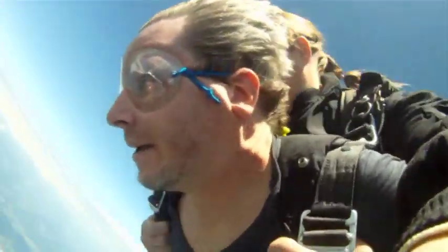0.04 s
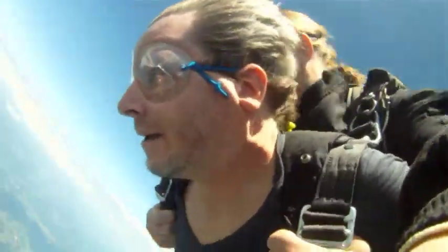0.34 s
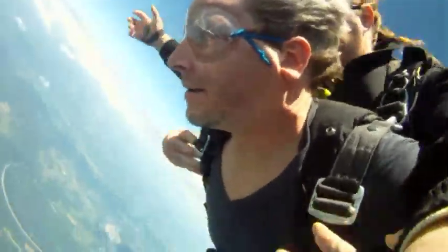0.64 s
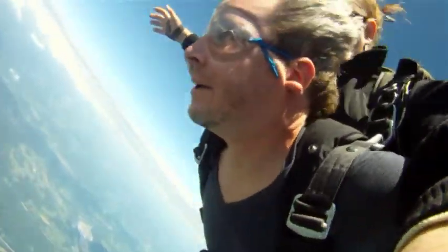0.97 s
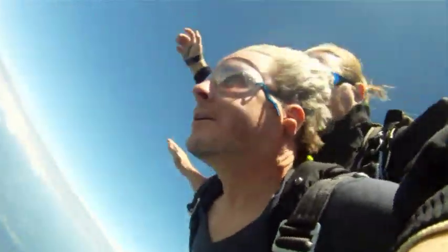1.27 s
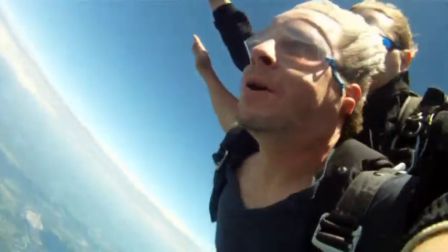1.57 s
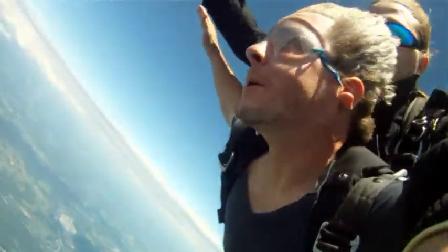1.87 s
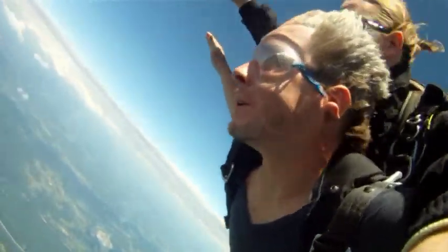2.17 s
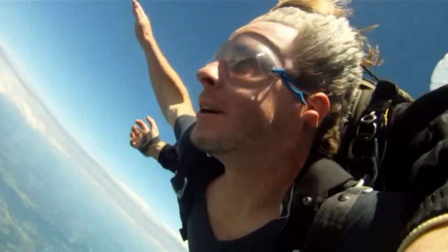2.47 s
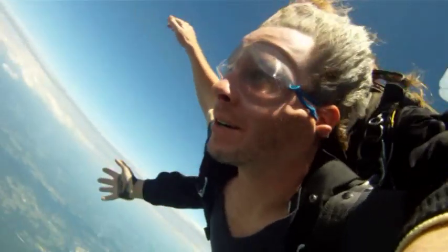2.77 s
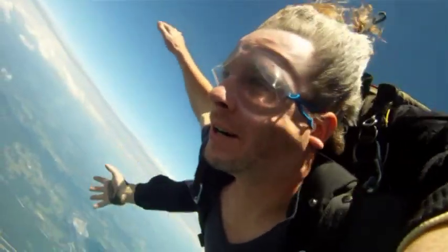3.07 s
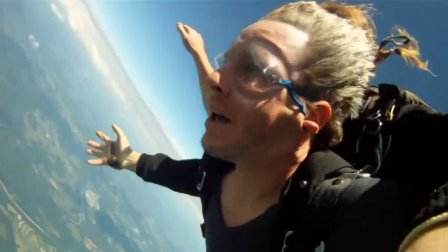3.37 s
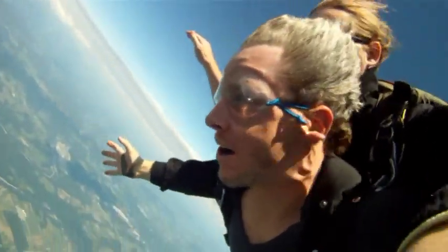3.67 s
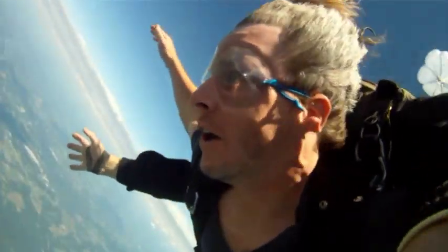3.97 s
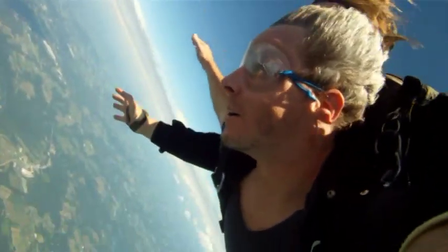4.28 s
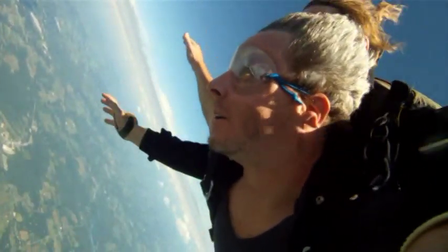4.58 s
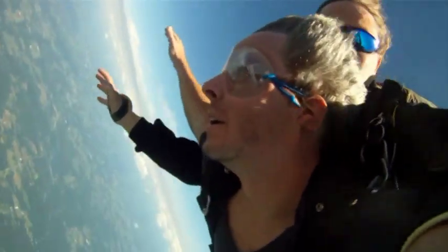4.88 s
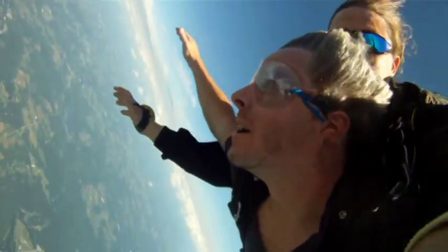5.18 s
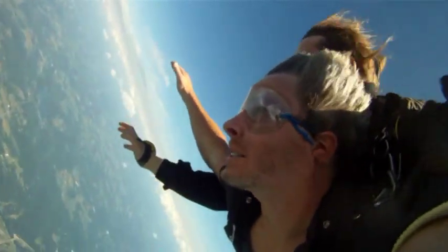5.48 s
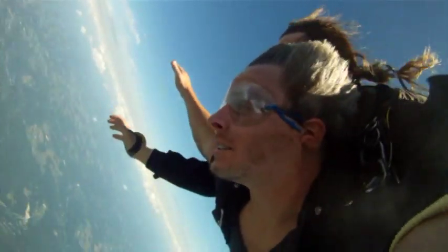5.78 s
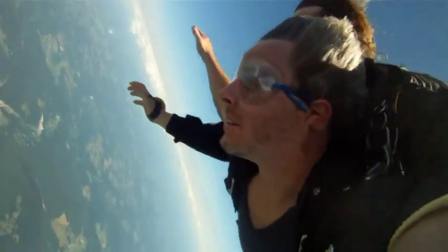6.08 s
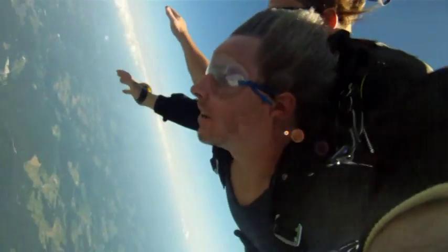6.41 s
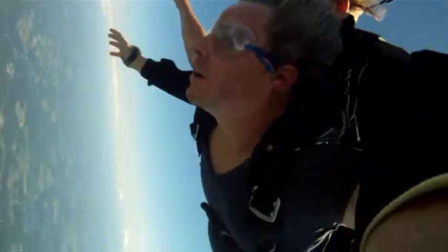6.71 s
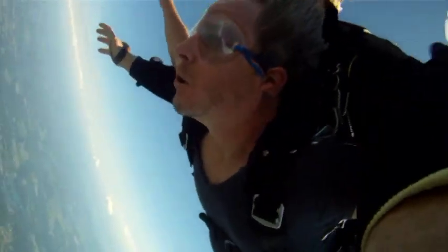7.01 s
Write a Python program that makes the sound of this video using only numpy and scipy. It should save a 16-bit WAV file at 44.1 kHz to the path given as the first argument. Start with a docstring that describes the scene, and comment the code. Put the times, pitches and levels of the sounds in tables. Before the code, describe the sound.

Loud freefall wind hits a small camera microphone at arm's length, a continuous roar and rumble with slight overload and a gritty fizz. It cuts out almost immediately and returns at 0.3 seconds as a bright, fluttering rush and hiss. Short roaring gusts pass at about 0.9 and 1.3 seconds. From 1.5 seconds, low buffeting trades places with the brighter noise, and brief gusts boom around 1.8, 3.2 and 3.7 seconds. The sound drops abruptly to silence for a tenth to a quarter of a second at about 2.4, 4.1, 4.7, 5.5 and 6.3 seconds, snapping straight back each time. The buffeting is heaviest at 5.6 seconds, a couple of gusts follow around 6 seconds, and the hiss peaks at 6.6 seconds. A low boom near 6.9 seconds and a short hollow howl just after 7 seconds close it, with the wind still rushing.

```python
"""Freefall wind on the microphone of a small camera at arm's length, over a steady roar and rumble.
The sound cuts out almost at once, then returns as bright rush and hiss. From 1.5 s these trade places
with low buffeting as the camera turns; single gusts boom or howl. Five more dropouts fall in 2.4-6.5 s.
Buffeting peaks at 5.6 s, hiss at 6.6 s; a low boom and a howl end it. Throughout, the capsule
overloads sooner on one side and the camera's slow, held samples add a gritty fizz."""
import sys
import numpy as np
from scipy import signal
from scipy.fft import rfft, irfft
from scipy.io import wavfile
from scipy.ndimage import uniform_filter1d

SR = 44100
rng = np.random.default_rng(int(sys.argv[2]) if len(sys.argv) > 2 else 0)


def log_audio(samples):
    """Write samples as a 16-bit WAV file to the path given in sys.argv[1]."""
    # one column per channel
    frames = np.atleast_2d(samples).T
    # limit to full scale, then quantise
    limited = np.clip(frames, -1, 1)
    pcm = np.round(limited * 32767).astype(np.int16)
    wavfile.write(sys.argv[1], SR, pcm)


N = 319725
TIME_S, FREQS_HZ = np.arange(N) / SR, np.fft.rfftfreq(N, 1 / SR)
SWELL_HZ = 6.8


def rush(bursts, spits):
    """Small eddies, bright and fluttering."""
    air = eddies(above(730, order=4) * below(2175, order=5))
    return steadied(air * gain_of(1.1 * bursts + 0.7 * spits), window_s=0.12)


def roar(bursts):
    """Mid-sized eddies, in bursts."""
    air = eddies(above(150, order=5) * below(644, order=4))
    return steadied(air * gain_of(1.8 * bursts), window_s=0.086)


def buffet(level_db, usual_hz=94, usual_db=-35, octaves_per_db=0.3):
    """The camera body sheds vortices among large eddies; stronger ones come more slowly."""
    shed_hz = usual_hz * 2 ** (octaves_per_db * (usual_db - level_db))
    shed = unit_rms(filtered(vortices(shed_hz, width_hz=65), above(45, order=3)))
    air = eddies(above(55, order=5) * below(180, order=5))
    return steadied(air + gain_of(-1) * shed, window_s=0.098)


def gusts():
    """Each gust swells and fades around one pitch: hollow if narrow, roaring if wide."""
    # peak_s, length_s, pitch_hz, width_hz, level_db
    gust_table = [(0.88, 0.15, 700, 900, -32), (1.26, 0.2, 300, 380, -29), (1.494, 0.049, 450, 200, -28.5),
                  (1.77, 0.098, 55, 25, -33), (2.324, .14, 150, 70, -34.5), (3.204, .14, 50, 50, -31),
                  (3.732, 0.074, 80, 30, -28), (4.496, 0.09, 500, 800, -32), (4.635, 0.1, 63, 30, -30),
                  (5.99, .07, 450, 400, -31.5), (6.115, 0.18, 225, 120, -33), (6.854, 0.39, 42, 25, -34.5),
                  (7.127, 0.16, 605, 180, -35.5)]
    total = np.zeros(N)
    for peak_s, length_s, pitch_hz, width_hz, level_db in gust_table:
        envelope = gain_of(level_db) * np.exp(-(2 * (TIME_S - peak_s) / length_s) ** 2)
        total += envelope * steadied(vortices(pitch_hz, width_hz), window_s=0.08)
    return total


def hiss(bursts, spits):
    """The smallest eddies, spitting."""
    air = eddies(above(2210, order=5) * below(5790, order=12))
    return unit_rms(air * gain_of(0.8 * bursts + 1.6 * spits))


def rumble():
    """The largest eddies."""
    return steadied(eddies(below(55, order=5)), window_s=0.14)


def eddies(band):
    """Turbulent pressure from one range of eddy sizes, rms 1."""
    # turbulence spectrum: freq_hz, density_db
    turbulence = [(10, -12.5), (25, 0.5), (50, 4.5), (100, 3.5), (200, -2), (350, -1), (600, -1),
                  (1000, -4.5), (2000, -8.5), (3000, -13), (4000, -17), (5000, -20), (6000, -21.5)]
    freq_hz, density_db = np.transpose(turbulence)
    colour = gain_of(np.interp(np.log(FREQS_HZ + 1), np.log(freq_hz), density_db))
    return unit_rms(filtered(rng.standard_normal(N), colour * band))


def vortices(rate_hz, width_hz):
    """Vortices shed near rate_hz: twice-resonated noise, rms 1."""
    rate_hz = rate_hz * np.ones(N)
    once = resonate(rng.standard_normal(N), rate_hz, width_hz)
    return unit_rms(resonate(once, rate_hz, width_hz))


def resonate(x, centre_hz, width_hz):
    """Resonance following the curve centre_hz."""
    carrier = np.exp(2j * np.pi * np.cumsum(centre_hz) / SR)
    pole = np.exp(-np.pi * width_hz / SR)
    return 2 * (carrier * signal.lfilter([1 - pole], [1, -pole], x / carrier)).real


def wander(cutoff_hz):
    """Low-passed random motion, rms 1."""
    return unit_rms(filtered(rng.standard_normal(N), below(cutoff_hz, order=2)))


def steadied(x, window_s):
    """Divides out slow swells, keeps quick flutter."""
    power = abs(uniform_filter1d(x ** 2, int(window_s * SR) + 1))
    return x / np.sqrt(power + 1e-9)


def gain_of(db):
    """Decibels to amplitude."""
    return 10 ** (np.asarray(db) / 20)


def unit_rms(x):
    """Scales to rms 1."""
    return x / np.sqrt(np.mean(x ** 2) + 1e-20)


def filtered(x, gain):
    """Applies one gain per frequency."""
    return irfft(rfft(x) * gain, N)


def below(hz, order):
    """Low-pass gain."""
    return 1 / np.sqrt(1 + (FREQS_HZ / hz) ** (2 * order))


def above(hz, order):
    """High-pass gain."""
    return np.sqrt(1 - below(hz, order) ** 2)


def overload(x, ceiling=0.22, trough=0.4):
    """The diaphragm runs out of travel sooner one way than the other."""
    limit = np.where(x > 0, ceiling, trough)
    return filtered(limit * np.tanh(x / limit), above(18, order=2))


def dropout_gate(fade_s=0.0016):
    """The camera's sound dies quickly and returns at once."""
    # start_s, end_s
    dropouts = [(0.0265, 0.2576), (2.4018, 2.5017), (4.07, 4.27), (4.718, 4.8848), (5.461, 5.5609),
                (6.2972, 6.5304)]
    gate = np.ones(N)
    for start_s, end_s in dropouts:
        gate *= np.where(TIME_S < end_s, np.clip((start_s - TIME_S) / fade_s, 0, 1), 1)
    return gate


def sample_and_hold(x, rate_hz=12000, guard_hz=5480, repeats=4):
    """Held samples mirror the wind around rate_hz: a fizz with a null at that rate."""
    guarded = filtered(x, below(guard_hz, order=14))
    mirrored = guarded * (1 + 2 * np.cos(2 * np.pi * rate_hz * TIME_S))
    hold_gain = np.sinc(FREQS_HZ / rate_hz) / np.sinc(FREQS_HZ / (repeats * rate_hz))
    return filtered(mirrored, hold_gain)


def scene():
    """Small eddies ride on large ones, so roar, rush and hiss share millisecond bursts."""
    # eddy levels as the camera turns: time_s, buffet_db, roar_db, rush_db, hiss_db
    airflow = [(0.26, -39, -32, -31, -35), (0.45, -37.5, -31.5, -30, -34), (0.72, -38.5, -33.8, -28.5, -36),
               (1.0, -37, -33.3, -30.5, -37.5), (1.42, -40.5, -34, -32, -38.5),
               (1.579, -33, -31.5, -32.5, -42), (1.82, -34.5, -32, -33, -41),
               (2.1, -34.5, -32, -30.6, -37.8), (2.55, -35, -32.5, -33, -40),
               (2.85, -34.5, -32, -31, -39.5), (3.3, -35.5, -34, -32.5, -39.5), (3.9, -34.5, -33, -31, -38),
               (4.45, -35, -32.5, -32.5, -39), (4.95, -34.8, -31.6, -32.8, -41),
               (5.299, -35.5, -32.6, -31, -39), (5.6, -32, -36, -35.5, -41.8),
               (5.88, -33.5, -31.8, -32.5, -38.5), (6.25, -38, -33, -32.5, -35.5),
               (6.58, -38, -31, -34, -34.5), (6.82, -35.5, -34.5, -33.5, -40.5),
               (7.25, -33, -32.5, -33, -36)]
    time_s, *levels_db = np.transpose(airflow)
    buffet_db, roar_db, rush_db, hiss_db = (np.interp(TIME_S, time_s, db) for db in levels_db)
    bursts, spits = wander(cutoff_hz=110), wander(cutoff_hz=600)
    treble_swell_db = 0.5 * wander(SWELL_HZ)
    wind = (gain_of(rush_db - 0.3 + treble_swell_db) * rush(bursts, spits)
            + gain_of(roar_db + 0.77 * wander(SWELL_HZ)) * roar(bursts)
            + gain_of(buffet_db + 0.23 + 1.1 * wander(SWELL_HZ)) * buffet(buffet_db)
            + gusts()
            + gain_of(hiss_db + 1.16 + treble_swell_db) * hiss(bursts, spits)
            + gain_of(-43.5 + wander(SWELL_HZ)) * rumble())
    return wind[None]


def record(dry):
    """Capsule overload, dropouts, held samples, band limit."""
    held = sample_and_hold(gain_of(0.65) * overload(dry[0]) * dropout_gate())
    lowpass = signal.firwin(1023, cutoff=15340, window=("kaiser", 9), fs=SR)
    return signal.oaconvolve(held, lowpass, "same")[None]


dry = scene()
out = record(dry)
log_audio(out)
```